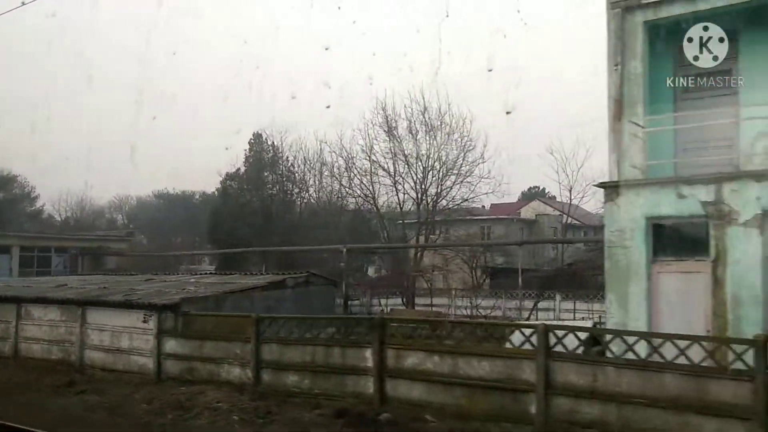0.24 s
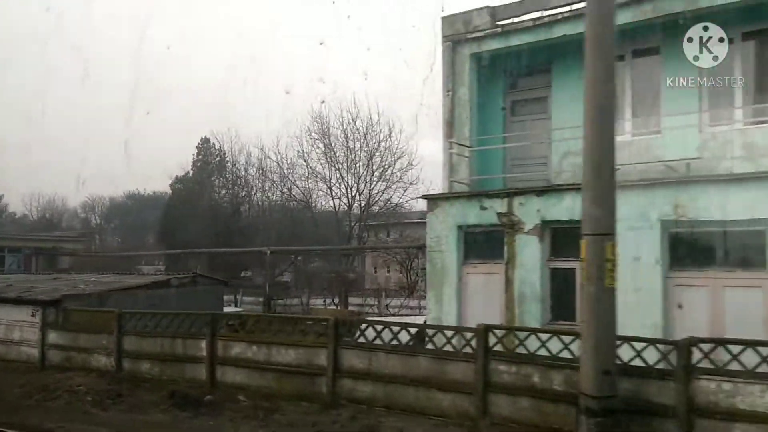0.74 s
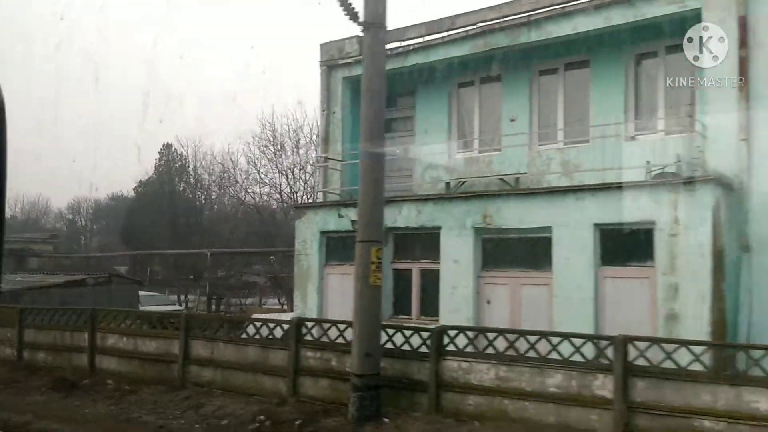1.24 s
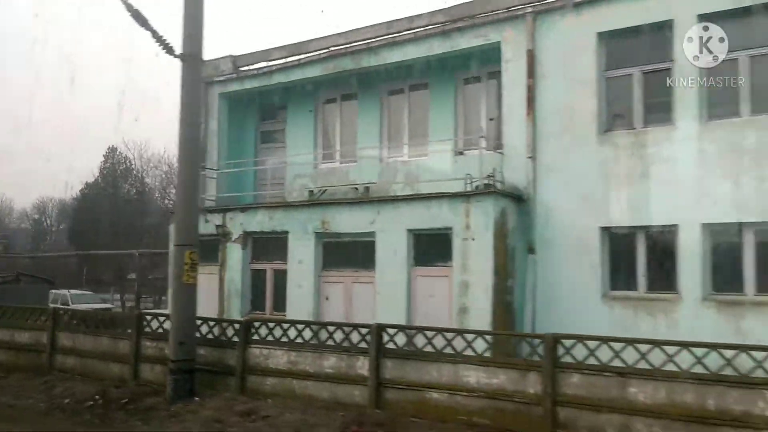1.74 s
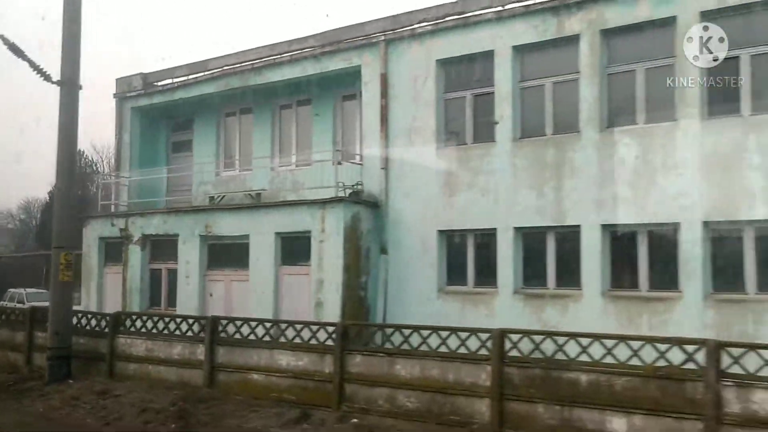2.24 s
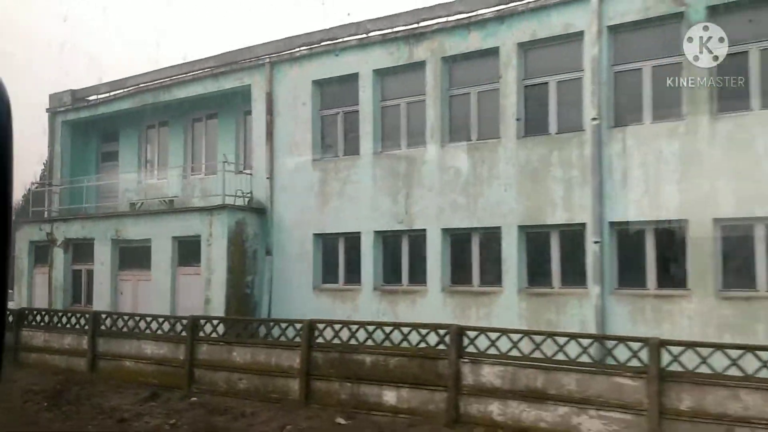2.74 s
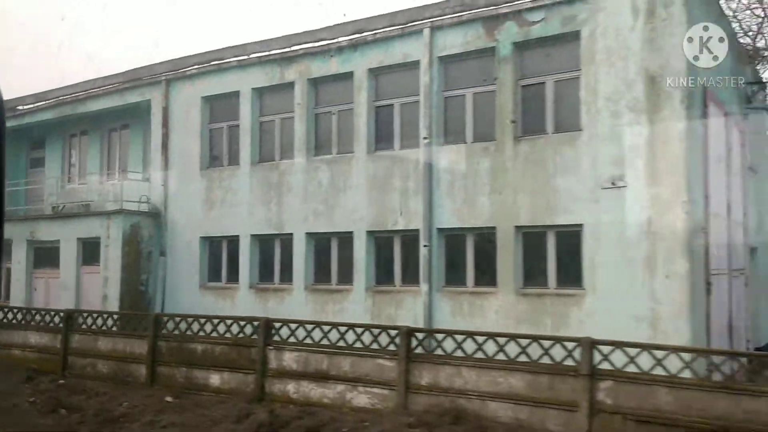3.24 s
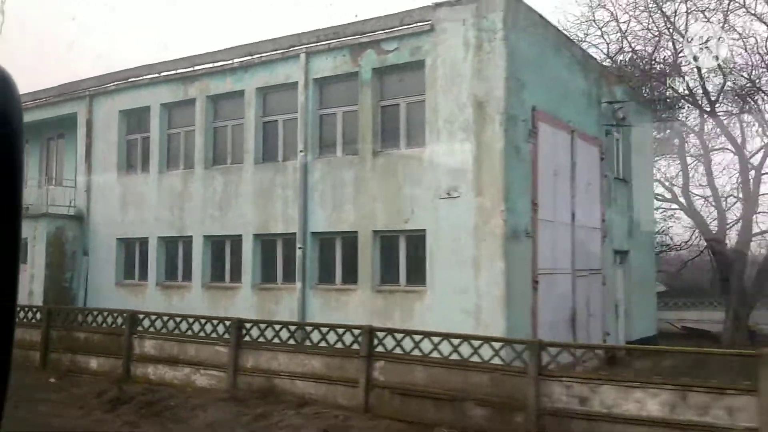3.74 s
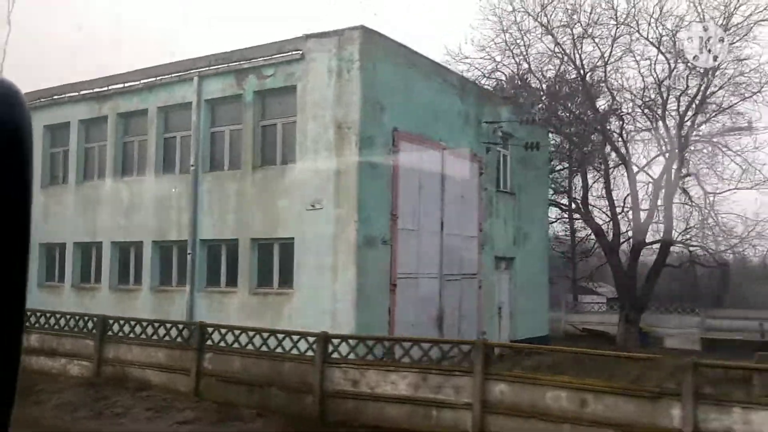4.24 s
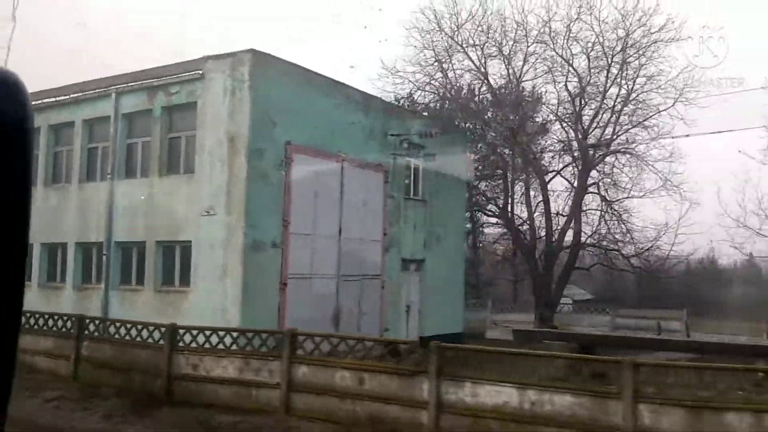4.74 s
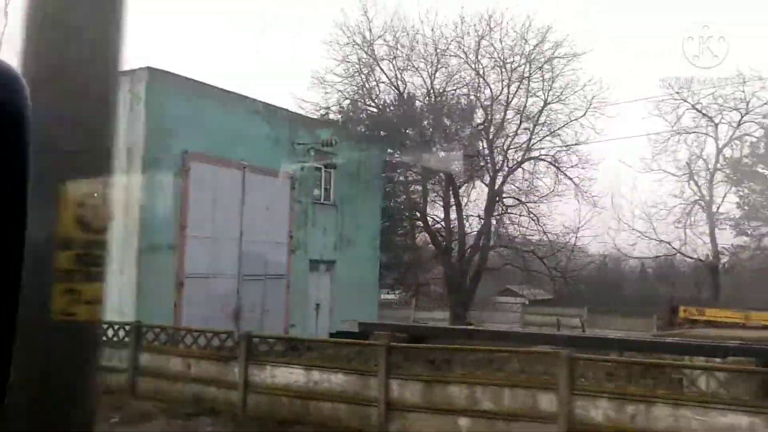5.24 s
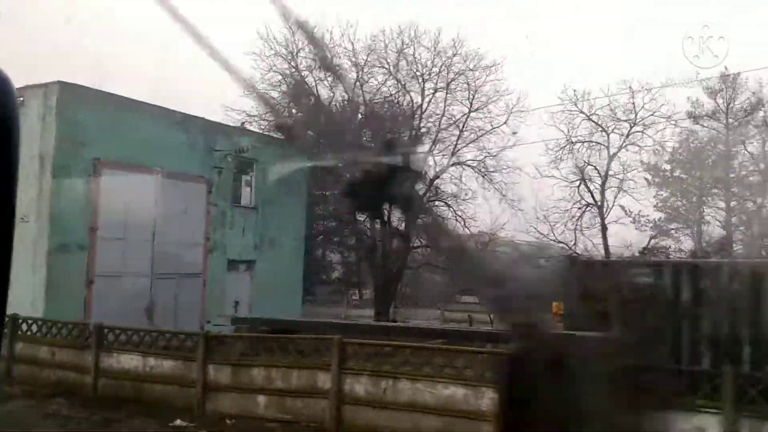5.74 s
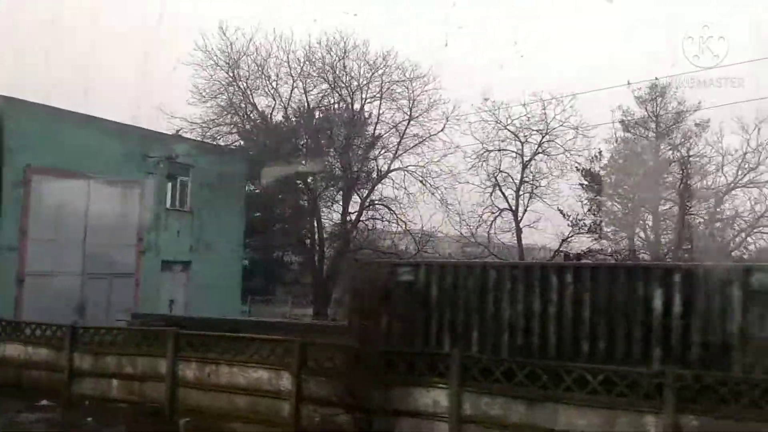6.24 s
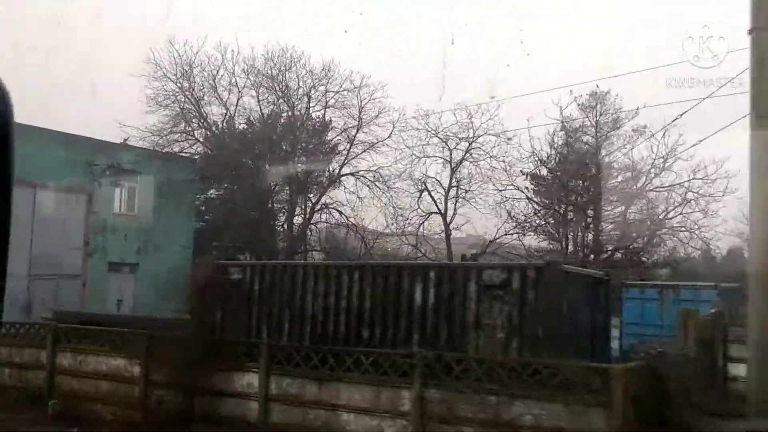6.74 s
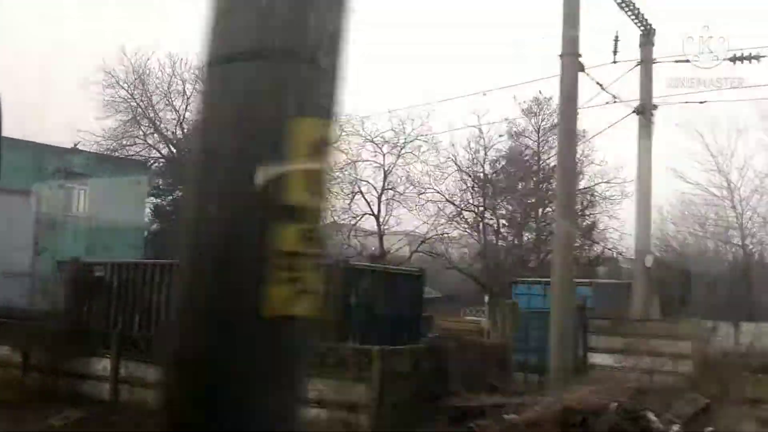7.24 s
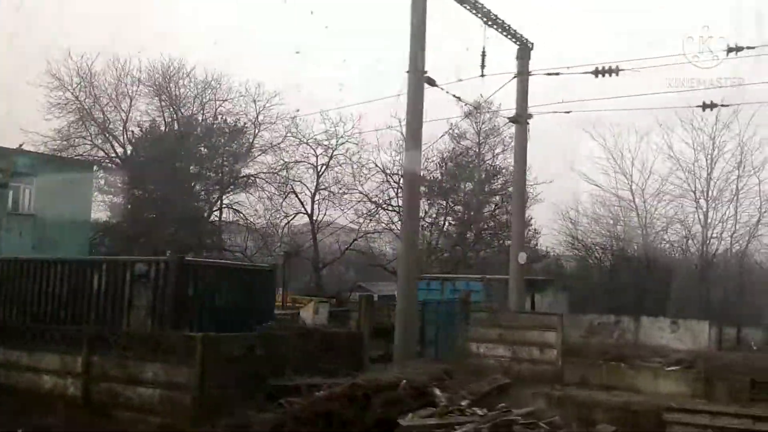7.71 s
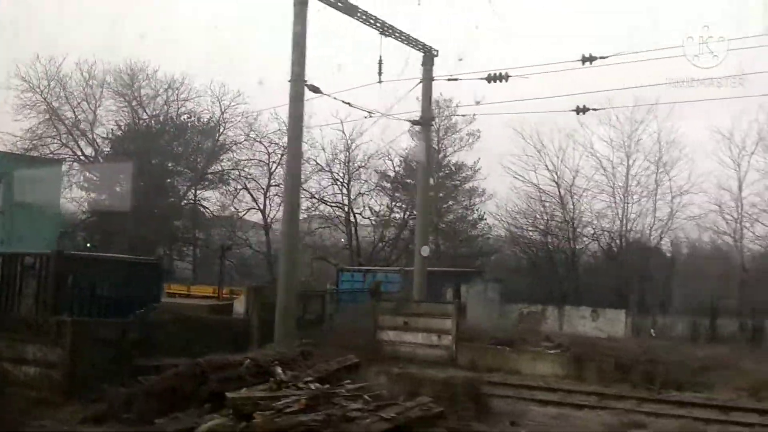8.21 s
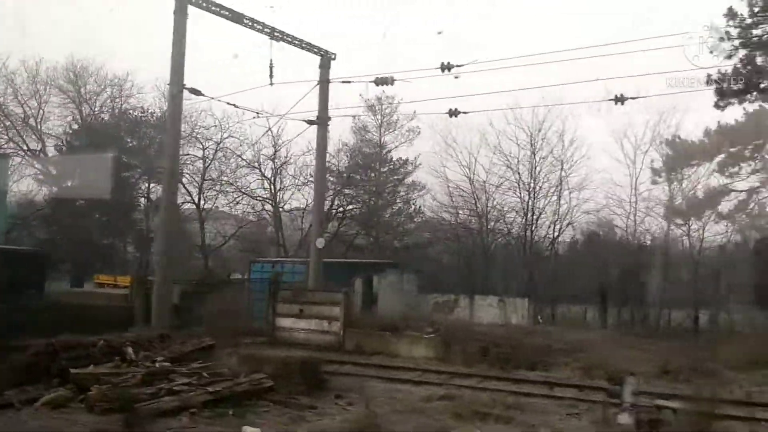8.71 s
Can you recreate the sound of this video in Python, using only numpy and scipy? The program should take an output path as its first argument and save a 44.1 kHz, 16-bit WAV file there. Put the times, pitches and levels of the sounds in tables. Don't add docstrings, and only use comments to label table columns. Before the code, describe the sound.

A train rolls slowly over rough jointed track, its floor and walls droning in deep, muffled, fluctuating waves. Dull bumps punctuate it throughout, strongest around the middle and in the last second. Faint chirps, small fabric rustles and a rough coupling clack add detail, then a short wavering creak. Close phone microphone inside the carriage, wide stereo, little treble, very faint hiss and thin electrical whine.

```python
import sys
import numpy as np
from scipy import signal
from scipy.fft import rfft, irfft, next_fast_len
from scipy.io import wavfile
from scipy.ndimage import uniform_filter1d

SR = 44100
rng = np.random.default_rng(int(sys.argv[2]) if len(sys.argv) > 2 else 0)


def file_out(sig):
    cols = np.atleast_2d(sig).T
    lim = np.clip(cols, -1, 1)
    pcm = np.round(lim * 32767).astype(np.int16)
    wavfile.write(sys.argv[1], SR, pcm)


def volts_from_decibels(level):
    exponent = np.asarray(level, float) / 20
    return 10 ** exponent


N = 395577
HZ = np.fft.rfftfreq(next_fast_len(N), 1 / SR)
T = np.arange(N) / SR


def along(table, hz):
    f, *columns = np.transpose(table)
    return [np.interp(np.log(np.maximum(hz, 1)), np.log(f), c) for c in columns]


def walk(rate, count=N, sr=SR):
    k = int(sr / rate)
    held = np.repeat(rng.standard_normal(count // k + 1), k)
    return 1.3 * uniform_filter1d(uniform_filter1d(held, k), k)[:count]


def noise():
    return rfft(rng.standard_normal(next_fast_len(N)))


def sound(spectrum):
    return irfft(spectrum, next_fast_len(N))[..., :N]


def blow(t, push_s, t60):
    t = np.maximum(t, 0)
    return (1 - np.exp(-t / push_s)) * volts_from_decibels(-60 * t / t60)


def swells(table, t):
    return sum(db * np.cos(np.pi * np.clip((t - s) / length, -.5, .5)) ** 2 for s, length, db in table)


def steady(band, hz):
    swell = uniform_filter1d(band[0] ** 2, size=int(3 * SR / hz)) / np.mean(band[0] ** 2)
    return band / (swell + 0.15) ** (0.17 * np.clip(np.log2(800 / hz), 0, 1))


# pitch_hz [Hz], level_db [dB per Hz]
BODY_COLOUR = [(20, -43.5), (36, -25.5), (52, -3.5), (72, -4.5), (110, -1), (160, -3), (240, -15.5),
               (370, -25), (560, -25.5), (760, -32), (950, -38), (1600, -42), (3400, -48.5), (4500, -56),
               (5200, -63), (9000, -82.5)]
# pitch_hz [Hz], width_hz [Hz], lift_db [dB over the body]
RINGING_PANELS = [(55.5, 4.9, 5.5), (97, 8.9, 1.5), (160.5, 13, 2), (309, 28, 5), (424, 26, 5),
                  (570, 14, 4), (676, 3.1, 1), (1039, 24, 6.5), (1256, 15, 5.5), (1560, 260, 3.5),
                  (3670, 32, 3.5)]
# pitch_hz [Hz], level_db [dB], likeness [0-1], lag_rad [radians]
FAR_PORT = [(40, 0.4, 0.92, 0.13), (95, -2, 1, 0.11), (188, -0.5, 0.97, 0.42), (276, -0.5, 0.7, 0.51),
            (380, -3.5, 0.64, 0.58), (507, -4, 0.9, 0.9), (730, -6, 0.4, 0.47), (974, -3, 0.5, 0.46),
            (1600, -8, 0, .1), (3500, -5, 0.05, 0.2), (7000, -9.5, .15, .1)]


def body_at_ports():
    ring = 0
    for hz, width, db in RINGING_PANELS:
        ring = ring + (volts_from_decibels(db) - 1) / (1 + ((HZ - hz) / (width / 2)) ** 2)
    ripple = uniform_filter1d(uniform_filter1d(rng.standard_normal(len(HZ)), size=200), size=100)
    ripple_db = 1.3 * np.clip(HZ / 700, 0, 1) * ripple / np.std(ripple)
    colour = volts_from_decibels(along(BODY_COLOUR, HZ)[0] + ripple_db) * (1 + ring)
    far_db, alike, lag = along(FAR_PORT, HZ)
    alike = np.clip(alike, 0, 1)
    near = noise()
    shared = alike * np.exp(-1j * lag) * near
    far = volts_from_decibels(far_db) * (shared + np.sqrt(1 - alike ** 2) * noise())
    return colour * np.array([near, far])


# time_s [s], level_db [dB]
TRACK_ROUGHNESS = [(0, -0.5), (1, -3.5), (1.5, -1.5), (2.3, -2.5), (2.8, -1), (3.6, 0), (4.3, 0), (5, 0.5),
                   (5.6, 0), (6.3, -1), (7, 1.5), (7.7, 0.5), (8.3, -1), (8.6, 3), (8.97, 1)]
ROUGHNESS_SHARE = [0.36, 3, 0.4, 0.37]
# middle_s [s], length_s [s], rise_db [dB]
BOGIE_LURCHES = [(.35, 0.26, 9.5), (.7, 0.33, 7.5), (1.7, 0.15, 5), (2.47, 0.17, 8.5), (3.0, 0.45, 9.5),
                 (3.47, 0.12, 4), (3.85, .4, 8.5), (4.27, .2, 7.5), (4.75, .25, 3.5), (5.85, 0.13, 8.5),
                 (6.63, .15, 9), (6.88, 0.27, 1), (7.1, .3, 3), (7.84, .15, 9.5), (8.52, .2, 12.5),
                 (8.86, 0.18, 4.5)]
# middle_s [s], length_s [s], rise_db [dB]
FLOOR_DRONES = [(.17, .15, 7.5), (.62, 0.18, 3), (1.93, 0.11, 11.5), (2.41, .12, 8), (2.98, 0.48, 10),
                (3.55, 0.24, 13), (3.81, 0.24, 3), (3.3, .25, 5.5), (4.1, 0.82, 4.5), (4.55, .2, 3.5),
                (4.9, 0.33, 8.5), (5.1, .15, 9), (5.4, 0.27, 9), (5.91, .15, 7), (6.62, 0.096, 2.5),
                (6.87, .1, 4.5), (6.99, .1, 7.5), (7.3, 0.96, 5), (7.85, .2, 4.5), (8.25, 0.2, 12),
                (8.5, .15, 6.5), (8.67, 0.056, 7.5), (8.84, 0.12, 3)]
# middle_s [s], length_s [s], rise_db [dB]
WALL_BOOMS = [(.3, .25, 3.5), (.5, .2, 4), (.98, 0.45, 7), (1.72, 0.13, 2.5), (1.92, 0.092, 8.5),
              (2.2, 0.16, 7), (2.4, 0.13, 6.5), (2.68, 0.23, 5), (2.855, .08, 12), (3.57, .1, 3.5),
              (3.92, 0.099, 5), (4.14, 0.07, 4), (4.58, 0.16, 7), (4.8, .15, 5.5), (5.27, .2, 1),
              (5.62, .2, 5.5), (5.8, 0.26, 6), (6.05, 0.074, 7), (6.57, .25, 5.5), (7.0, 0.13, 8.5),
              (7.83, .12, 15.5), (8.25, 0.23, 9), (8.52, 0.17, 9), (8.63, .05, 11.5), (8.84, 0.1, 8.5)]


def rolling_load(t):
    rough = np.outer(ROUGHNESS_SHARE, np.interp(t, *np.transpose(TRACK_ROUGHNESS)))
    bogie = swells(BOGIE_LURCHES, t) - 2.5
    floor = 0.22 * swells(FLOOR_DRONES, t) - 3
    wall = swells(WALL_BOOMS, t) - 1.5
    return rough + np.array([bogie, floor, wall, 0 * t])


# start_s [s], knock_db [dB], thud_db [dB to knock], edge_db [dB to knock]
RAIL_JOINTS = [(0.233, -32, -3.5, -10), (0.589, -31.5, 2.5, -12), (1.378, -39, 4.5, -11.5),
               (1.628, -27.5, -3, -14), (2.421, -27.5, 7, -14), (2.489, -34.5, 0.5, -6),
               (2.815, -28.5, 5.5, -13), (3.188, -41, -10.5, -5), (3.55, -31, -11.5, -16.5),
               (3.944, -26, -9, -11.5), (4.21, -29, -6.5, -15), (4.239, -33.5, -12, -1.5),
               (4.335, -22.5, -8.5, -17), (4.734, -28.5, 0, -13), (5.462, -33, -5.5, -16),
               (5.829, -30.5, -17.5, -12), (6.091, -35, 1.5, -15), (6.575, -26, -9.5, -10),
               (6.991, -29, -4, -10.5), (7.658, -33, -7.5, -10), (7.801, -32, 3, -13),
               (8.22, -37, 4.5, -14.5), (8.421, -28.5, -4.5, -8.5), (8.459, -31.5, 1, -4.5),
               (8.501, -25, -2, -7), (8.539, -36, 7.5, -9), (8.601, -28.5, 3, -4),
               (8.669, -36.5, 1.5, -1.5), (8.818, -31.5, 7, -8.5), (8.865, -32.5, -2, -10)]
BLOW_HZ = [130, 290, 550, 1200, 3000]
BLOW_LIFT_DB = [16.3, 33.5, 35.3, 38.25, 35.7]
# pitch_hz [Hz], push_s [s], t60_s [s]
BLOW_RING = [(100, 0.013, 0.6), (290, .012, 0.28), (500, 0.017, 0.26), (2000, 0.007, 0.35),
             (8000, .012, 0.17)]


def joint_blows(t, hz):
    power = np.zeros(len(t))
    for when, db, thud_db, edge_db in RAIL_JOINTS:
        over = db + np.array([0, thud_db, 0, edge_db, edge_db]) + BLOW_LIFT_DB
        over_db = np.interp(np.log(hz), np.log(BLOW_HZ), over)
        over_db -= 5 * max(np.log2(hz / 4000), 0)
        after = slice(np.searchsorted(t, when), np.searchsorted(t, when + 1))
        power[after] += (volts_from_decibels(over_db + 8) * blow(t[after] - when, *along(BLOW_RING, hz))) ** 2
    return power


def floor_drone(ports):
    mode_hz, width_hz, level_db = 99.4, 9.3, -3
    mode = sound(ports / (1 + ((HZ - mode_hz) / (width_hz / 2)) ** 2))
    t = T[::64]
    return steady(mode, mode_hz / 4) * np.interp(T, t, volts_from_decibels(level_db + 1.43 * swells(FLOOR_DRONES, t)))


LOAD_HZ = [55, 100, 165, 400]


def carriage():
    ports, out = body_at_ports(), 0
    t = T[::64]
    load = rolling_load(t)
    shudder = walk(7, len(t), SR / 64)
    for hz in 25 * 2 ** (np.arange(18) / 2):
        octaves = np.log2(np.maximum(HZ, 1) / hz)
        share = np.cos(np.clip(octaves, -.5, .5) * np.pi) ** 2
        weights = [np.interp(np.log(hz), np.log(LOAD_HZ), part) for part in np.eye(len(LOAD_HZ))]
        flicker = 0.77 * walk(8.3, len(t), SR / 64)
        power = volts_from_decibels(weights @ load + shudder + flicker) ** 2 + joint_blows(t, hz)
        out = out + steady(sound(ports * share), hz) * np.interp(T, t, np.sqrt(power))
    out = out + floor_drone(ports)
    return out * volts_from_decibels(-23.0) / np.std(out[0])


HISS_LEVEL_DB = [-76, -84.5]


def hiss():
    return volts_from_decibels(np.array(HISS_LEVEL_DB))[:, None] * rng.standard_normal((2, N)) * volts_from_decibels(1.0 * walk(5.1))


# pitch_hz [Hz], left_db [dB], right_db [dB], end_s [s]
CONVERTER_WHINES = [
    (14002, -86, -99, 2.3),
    (11908, -103, -94, 9.5),
]


def whine():
    out = np.zeros((2, N))
    for hz, left_db, right_db, until in CONVERTER_WHINES:
        tone = np.sin(2 * np.pi * hz * T + .8 * walk(12)) * (T < until)
        out += volts_from_decibels(np.array([[left_db], [right_db]])) * tone
    return out


def rings(table, push_s, rough_s):
    out = np.zeros(N)
    t = np.arange(int(.3 * SR)) / SR
    size = int(rough_s * SR)
    for when, db, hz, t60 in table:
        grit = rng.standard_normal((2, len(t)))
        rough = signal.fftconvolve(grit, np.hanning(2 * size)[None], "same") / np.sqrt(size)
        tone = (1 + 0.55 * rough[0]) * np.cos(2 * np.pi * hz * t)
        tone += 1.1 * rough[1] * np.sin(2 * np.pi * hz * t)
        i = int(when * SR)
        out[i:i + len(t)] += (volts_from_decibels(db) * blow(t, push_s, t60) * tone)[:N - i]
    return out


# start_s [s], peak_db [dB], pitch_hz [Hz], t60_s [s]
FITTING_SQUEAKS = [(0.38, -55, 7700, 0.083), (1.2236, -70.5, 7700, 0.083), (2.4349, -55, 8260, 0.1),
                   (5.6471, -71, 7940, 0.19), (7.3018, -57, 7690, 0.092), (8.6118, -50.5, 8120, 0.12),
                   (2.4563, -59, 10600, 0.18), (2.5965, -68, 10700, 0.16), (2.8639, -63.5, 10500, 0.13),
                   (2.9911, -62, 10600, 0.13), (3.7459, -59.5, 10440, 0.14), (4.147, -64, 10400, 0.12),
                   (5.686, -71, 10240, 0.16), (6.6937, -67, 10330, 0.19), (7.4834, -65, 10600, 0.11),
                   (8.8034, -63, 10430, 0.13), (2.455, -64, 10100, 0.13)]


def squeaks():
    return rings(FITTING_SQUEAKS, push_s=0.0052, rough_s=0.002)


# start_s [s], length_s [s], dull_db [dB], bright_db [dB]
CLOTH_BRUSHES = [(1.683, 0.09, -81, -84.5), (2.212, .05, -72, -86.5), (2.881, 0.12, -75, -86),
                 (3.316, 0.077, -68.5, -76.5), (4.242, 0.021, -80, -90), (4.362, 0.065, -77.5, -83),
                 (6.576, 0.076, -71.5, -89.5), (7.108, .02, -64, -72.5), (8.419, 0.2, -74.5, -87),
                 (8.485, 0.027, -79, -84.5), (8.603, 0.042, -64.5, -74.5), (8.658, .15, -74, -82.5),
                 (8.854, 0.051, -80, -86)]


def rustle():
    out = 0
    for column, hz in enumerate([5500, 12000]):
        shape = 0
        for s, length, *db in CLOTH_BRUSHES:
            shape = shape + volts_from_decibels(db[column]) * np.clip(np.minimum(T - s, s + length - T) / 0.011, 0, 1)
        band = 1 / (1 + (np.log2((HZ + 1) / hz) / 0.5) ** 4)
        out = out + shape * sound(np.array([noise(), noise()]) * band)
    return np.array([[3], [1.4]]) * out * volts_from_decibels(2.0 * walk(200))


# start_s [s], peak_db [dB], pitch_hz [Hz], t60_s [s]
COUPLING_CLACK = [
    (4.241, -34, 1600, 0.14),
    (4.243, -40, 1345, 0.17),
    (4.243, -40, 1003, .15),
    (4.243, -44, 2060, .16),
    (4.243, -43.5, 2590, 0.14),
    (4.243, -43.5, 2990, 0.092),
    (4.243, -55, 3500, 0.092),
    (4.243, -57, 4070, .08),
    (8.595, -56, 3500, 0.17),
    (8.61, -53, 1690, 0.21),
]


def clack():
    start_s, level_db, pitch_hz, t60_s = 4.243, -42.5, 2240, 0.11
    burst = sound(noise() / (1 + (np.log2((HZ + 1) / pitch_hz) / .6) ** 4))
    crack = volts_from_decibels(level_db) * burst / np.std(burst) * blow(T - start_s, 0.003, t60_s)
    return rings(COUPLING_CLACK, push_s=0.0011, rough_s=0.0026) + crack


# time_s [s], pitch_hz [Hz, pitch the partial multiples refer to], level_db [dB]
CREAK_GLIDE = [
    (8.64, 1757, -52),
    (8.67, 1808, -50),
    (8.70, 1817, -53),
    (8.73, 1890, -51.5),
    (8.76, 1910, -54.5),
    (8.79, 1830, -54.5),
    (8.83, 1755, -60),
]
# multiple [of the pitch], level_db [dB]
CREAK_PARTIALS = [(0.551, 8.5), (.9, -11), (0.998, 4), (1.3, 0), (1.62, -4), (1.85, -12), (2.05, -16),
                  (2.76, -17), (2.85, -15), (5.85, -26)]


def creak():
    s, hz, db = np.transpose(CREAK_GLIDE)
    t = T[-SR // 2:]
    turns = np.cumsum(np.interp(t, s, hz) * (1 + .006 * walk(60, len(t)))) / SR
    tone = 0
    for k, part_db in CREAK_PARTIALS:
        level = volts_from_decibels(part_db + 3.0 * walk(90, len(t)))
        jitter = (.6 + .7 * k) * walk(150, len(t))
        tone = tone + level * np.sin(2 * np.pi * k * turns + jitter)
    fade = np.clip(np.minimum(t - s[0], s[-1] - t) / 0.015, 0, 1)
    return np.pad(tone * volts_from_decibels(np.interp(t, s, db)) * fade, (N - len(t), 0))


def scene():
    close = squeaks() + clack() + creak()
    return carriage() + close * np.array([[1], [.15]]) + rustle()


def widen(dry):
    share, lag_s = np.array([[0.61], [0.64]]), 0.0004446
    before = dry[:, next_fast_len(N) - N:0:-1]
    delay = np.exp(-2j * np.pi * HZ * lag_s) / (1 + (HZ / 12000) ** 2)
    late = sound(rfft(np.hstack([dry, before])) * delay)
    return dry - share * late[::-1]


def roll_off(x):
    return signal.sosfilt(signal.butter(12, 15460, fs=SR, output="sos"), x)


def record(dry):
    dry = dry * np.clip((T[-1] - T) / .005, 0, 1)
    return roll_off(widen(dry) + hiss() + whine())


dry = scene()
out = record(dry)
file_out(out)
```